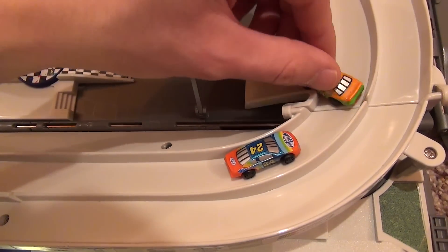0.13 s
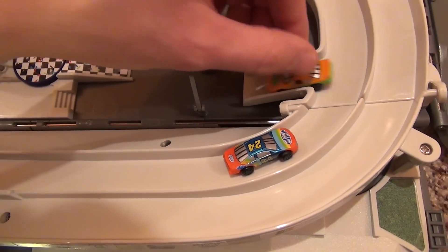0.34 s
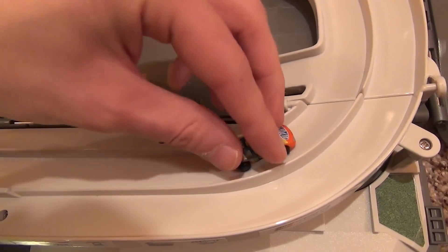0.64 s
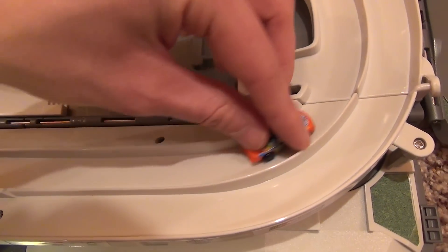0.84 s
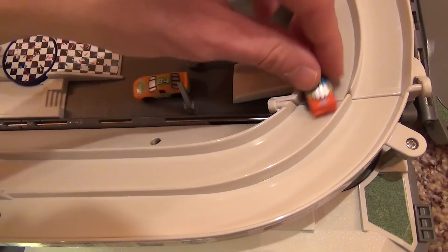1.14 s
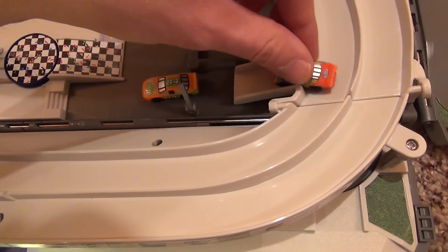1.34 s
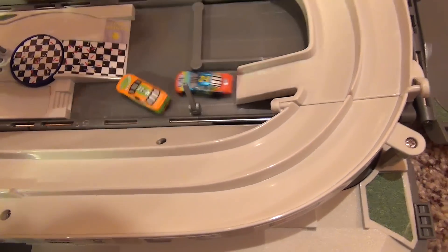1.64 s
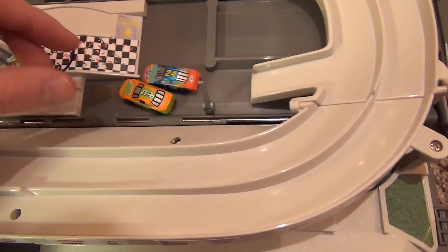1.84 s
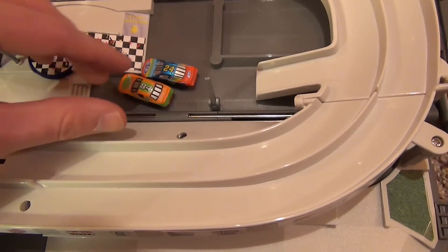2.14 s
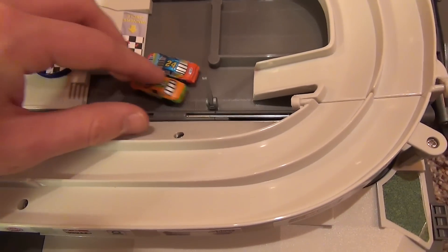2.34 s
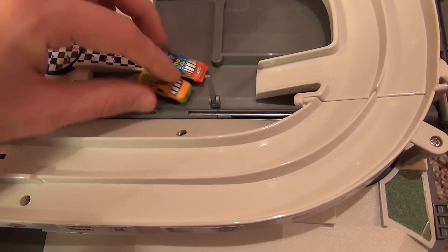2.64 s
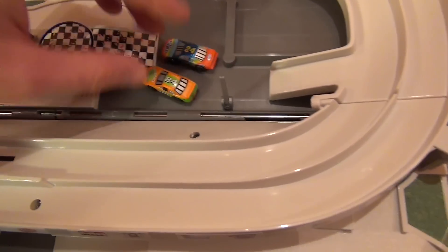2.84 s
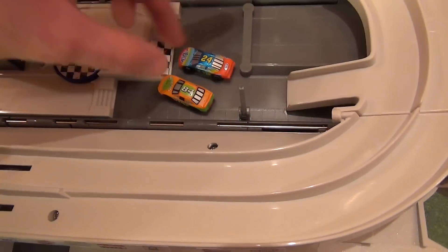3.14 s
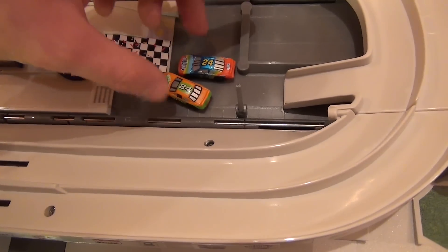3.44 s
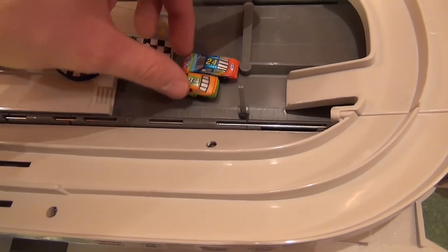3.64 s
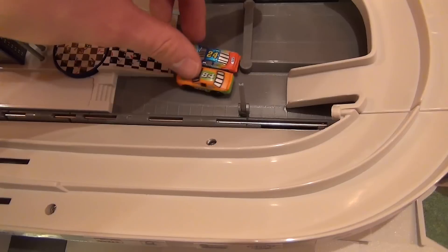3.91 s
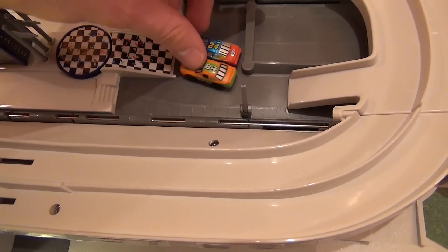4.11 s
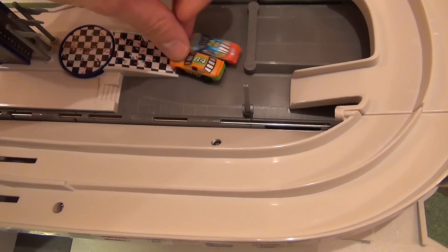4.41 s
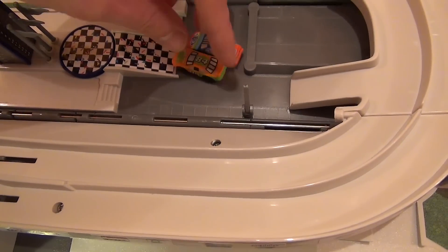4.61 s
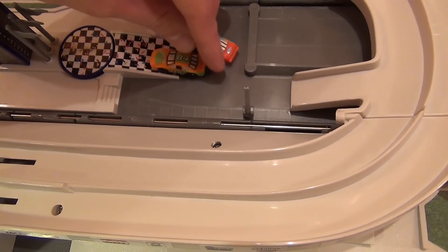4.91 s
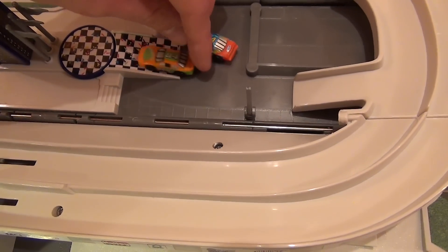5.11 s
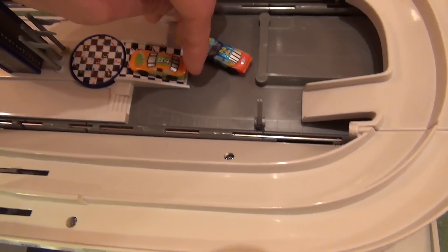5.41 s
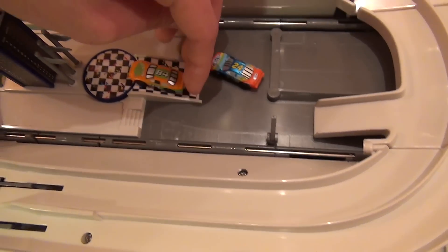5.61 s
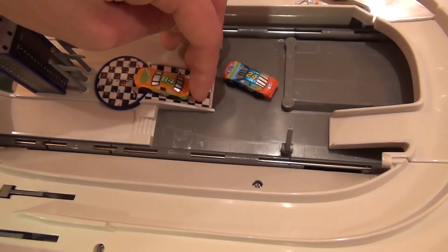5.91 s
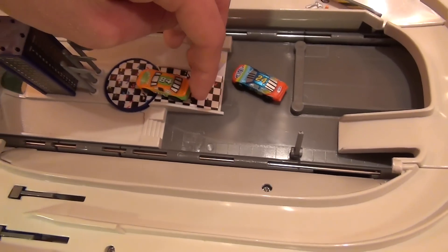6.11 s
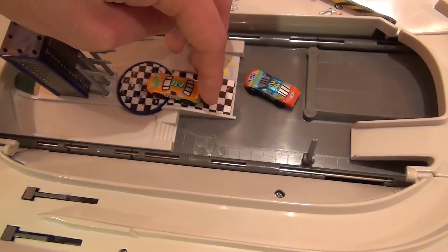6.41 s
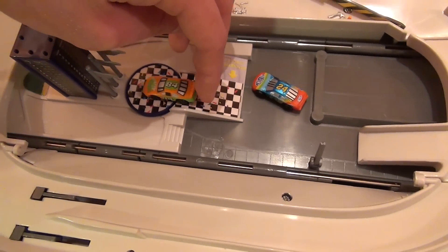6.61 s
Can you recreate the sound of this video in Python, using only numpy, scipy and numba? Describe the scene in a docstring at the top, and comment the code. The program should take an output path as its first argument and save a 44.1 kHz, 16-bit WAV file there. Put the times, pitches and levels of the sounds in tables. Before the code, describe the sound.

Light, bright clicks, taps and short rattling rolls of little toy cars on a plastic track, over a faint room hum.

```python
"""Two small die-cast toy cars are set down, let roll and nudged by hand on a hollow plastic track.
Each impact excites damped normal modes: bright, short ones in the car, dull, longer ones in the track.
Rolling drives the same modes with a dense stream of tiny contacts; light wheel and axle ticks ring
the car alone. The hollow ramp thrums at first. A wall echo and brief reverberation follow the contacts,
and a quiet room hums below, with two thin electronic whines."""
import sys
import numpy as np
from scipy import signal
from scipy.fft import rfft, irfft
from scipy.io import wavfile
from numba import njit

SR = 44100
rng = np.random.default_rng(int(sys.argv[2]) if len(sys.argv) > 2 else 0)


def dump(signal):
    """Clip the signal to [-1, 1] and save it as 16-bit WAV at the path in sys.argv[1]."""
    limited = np.clip(np.atleast_2d(signal).T, -1, 1)
    pcm = np.round(limited * 32767).astype(np.int16)
    wavfile.write(sys.argv[1], SR, pcm)


N = 297654

# spectral density of the room noise: frequency_hz, relative_db
HUM_SPECTRUM = [(20, -23), (90, 3.5), (400, -9), (640, -7), (1430, -7.5), (1560, -17.5), (4800, -26.5),
                (5600, -22), (16000, -27.5)]
# electronic whines: pitch_hz, rms_db
WHINE_TONES = [(7854, -80), (13248, -74)]
# normal modes of the plastic track: pitch_hz, relative_db, t60_s
TRACK_MODES = [(310, -17, 0.037), (495, -9.5, 0.011), (730, -10.5, 0.066), (873, 3.5, 0.011),
               (1038, -8, 0.034), (1368, -9.5, 0.032), (1731, -7, 0.011), (2110, -14, 0.0053),
               (2240, 7.5, 0.002)]
# normal modes of the car body, axles and wheels: pitch_hz, relative_db, t60_s
CAR_MODES = [(1784, -12, 0.005), (3845, -5, 0.0038), (4385, -8.5, 0.021), (5380, -12.5, 0.0065),
             (5860, -16.5, 0.012), (6252, -4, 0.0078), (7360, -8.5, 0.0087), (8217, -1, 0.015),
             (9130, 0.5, 0.0038), (9650, -1, 0.0036), (10750, -4.5, 0.004), (12100, -21.5, 0.0033)]
# which car is held, and how, favours some modes: start_s, mode_0_db, mode_2_db, modes_4_5_db, modes_6_7_db
GRIP_GAINS = [(0, 3.5, -5, 2, -2.5), (3.1, 2, 0.5, 2, -4.5), (4.749, 1, -2, 5, -8.5),
              (5.38, 9, -13, 5.5, -7.5)]
# spells of rolling and sliding: start_s, end_s, rattle_start_db, swell_db, rumble_start_db
ROLLING_SPELLS = [(-0.01, 0.343, -36.5, -15.5, -42.5), (0.425, 0.484, -32.5, 15, -41.5),
                  (0.496, 0.804, -20, -1.5, -29.5), (0.839, 1.051, -38, -1, -35),
                  (1.059, 1.128, -31, -5, -33.5), (1.22, 1.437, -38, -6, -39),
                  (1.457, 1.616, -31, 10.5, -35.5), (1.623, 1.802, -19.5, -6, -28.5),
                  (1.858, 1.926, -37, 3.5, -40), (2.43, 2.53, -35.5, 0, -33),
                  (2.637, 2.825, -41.5, -8, -39), (3.308, 3.335, -42.5, -5, -43),
                  (3.701, 3.875, -38.5, -10, -37), (4.006, 4.105, -46.5, 6.5, -44.5),
                  (4.114, 4.285, -58.5, 8.5, -50.5), (4.481, 4.569, -26, -13, -30.5),
                  (4.876, 5.05, -33.5, -32, -32.5), (5.05, 6.459, -53.5, -13, -47.5)]
# light ticks of wheels and axles: time_s, strength_db, pitch_hz
WHEEL_TICKS = [(0.4243, -7.5, 8400), (0.4668, -14, 6240), (0.5723, -3, 8800), (0.5851, -8.5, 11300),
               (0.6887, -3, 6300), (0.7803, -2.5, 6300), (1.497, -0.5, 9600), (1.532, 3, 9100),
               (1.5661, -5, 9100), (1.6409, -6.5, 8600), (1.6646, -5.5, 9100), (1.677, -3, 8040),
               (1.6958, -7, 8590), (1.7052, -1, 8200), (2.393, -3, 9500), (2.4552, -2, 9000),
               (2.855, -18.5, 8800), (3.649, -23.5, 5970), (3.7431, -19, 9500), (3.892, -13.5, 10100),
               (4.0622, -13.5, 5870), (4.373, -18.5, 11200), (4.458, -20, 9900), (4.837, -14, 10600),
               (5.1841, 3, 9100), (5.1913, 1, 8500), (5.298, -17, 10200), (5.846, -31.5, 5940),
               (5.9485, -36.5, 6140), (5.979, -33, 5700), (6.06, -33.5, 5560), (6.1176, -30.5, 8150),
               (6.2145, -29, 10400), (6.2844, -22, 8860), (6.346, -23.5, 11200), (6.418, -22, 6080),
               (6.6042, -20.5, 6700), (6.618, -29.5, 6000)]
# knocks of car on track: time_s, car_strength_db, track_strength_db
IMPACTS = [(0.016, -10, -15), (0.126, -21, -28.5), (0.215, -10, -17), (0.266, -26, -23),
           (0.401, -22.5, -28), (0.529, -7.5, -16), (0.624, -12.5, -24), (0.708, -9.5, -18),
           (0.756, -7, -22), (0.802, -11, -20), (0.818, -8.5, -27.5), (0.86, -10, -24),
           (1.039, -9.5, -14.5), (1.091, -11.5, -14), (1.175, -21.5, -18.5), (1.235, -6, -17.5),
           (1.458, -12.5, -19.5), (1.615, -10, -27), (1.723, -7, -25), (1.752, -10.5, -22),
           (1.886, -18, -51), (2.012, -20.5, -26.5), (2.355, -21.5, -21.5), (2.367, -5, -18.5),
           (2.383, -15, -26), (2.495, -16.5, -24.5), (2.513, -14.5, -24.5), (2.628, -19, -31),
           (2.668, -17, -24.5), (2.728, -19.5, -25), (2.779, -24.5, -23), (2.842, -13.5, -19),
           (3.311, -29.5, -36), (3.36, -14.5, -21), (3.66, -8.5, -17), (3.706, -16.5, -20),
           (3.866, -19, -18.5), (3.932, -9, -26.5), (3.958, -20, -28), (4.041, -21, -23.5),
           (4.345, -19, -20), (4.428, -23, -21.5), (4.483, -8.5, -22), (4.537, -11, -15.5),
           (4.565, -12.5, -19.5), (4.653, -35.5, -32.5), (4.716, -42, -32.5), (4.853, -8, -15.5),
           (4.881, -6, -12), (4.891, -4.5, -26), (4.922, -1, -11.5), (5.025, -26.5, -32), (5.043, -36, -23),
           (5.169, -27, -31), (5.224, -12.5, -20), (5.254, -23.5, -23.5), (5.288, -5.5, -15.5),
           (5.409, -25, -43), (5.449, -39, -27.5), (5.675, -19, -21.5), (5.74, -40, -36),
           (5.831, -21, -23.5), (5.864, -29.5, -30), (5.915, -36, -31.5), (6.002, -31.5, -34.5),
           (6.178, -27, -30.5), (6.394, -25.5, -35), (6.652, -29.5, -29.5)]

RAMP_UNTIL_S, RAMP_DB = 2.4, 8   # on the raised ramp the 1368 Hz track mode rings louder
START_DB_PER_S, STOP_DB_PER_S = 905.5, 296   # attack and decay of a spell
RUMBLE_FOLLOWS = 0.66   # share of the rattle's swell that the rumble follows
SETTLE_CAR_DB, SETTLE_TRACK_DB, SETTLE_DB_PER_S = -24, -9, 305.5   # the jiggle after a contact
TICK_FOCUS_DB_PER_OCTAVE = 21   # modes away from a tick's pitch are struck more weakly
DETUNE = 0.029   # relative spread of mode pitch from contact to contact
ROLL_DAMPING = 0.54   # wheels resting on the track shorten the decay times to this share


def from_db(db):
    """Amplitude ratio: tenfold for every 20 dB."""
    return 10 ** (np.asarray(db) / 20)


def unit_rms(x):
    """Normalisation to unit mean power."""
    return x / np.sqrt(np.mean(x ** 2) + 1e-20)


def drift(rate_hz):
    """Low-pass filtering turns white noise into a slow fluctuation of unit rms."""
    pole = np.exp(-80 * np.pi * rate_hz / SR)   # one step per 40 samples
    slow = signal.lfilter([1], [1, -2 * pole, pole * pole], rng.standard_normal(N // 40 + 2002))[2000:]
    return np.interp(np.arange(N) / 40, np.arange(len(slow)), unit_rms(slow))


def high_pass(x, hz):
    """Radiation efficiency: a small body radiates little bass."""
    return signal.sosfilt(signal.butter(3, hz, "high", fs=SR, output="sos"), x)


@njit
def resonate(force, poles):
    """A driven phasor turns and decays by its complex pole at each sample."""
    out, state = np.zeros(len(force)), 0j
    for i in range(len(force)):
        state = state * poles[i] + force[i]
        out[i] = state.imag
    return out


def ring(force, hz, t60):
    """Damped oscillator: a unit impulse starts a decaying sine of height 1; the pitch may vary."""
    pole = from_db(-60 / (t60 * SR)) * np.exp(2j * np.pi * hz / SR)
    return resonate(force + 1e-18, pole * np.ones(N))


def room_hum(correlation=0.9, rms_db=-54.5):
    """Partial coherence: steady noise, mostly common to both channels, lies under pure whines."""
    hz = np.maximum(np.fft.rfftfreq(N, 1 / SR), 1)
    corner_hz, corner_db = np.transpose(HUM_SPECTRUM)
    colour = from_db(np.interp(np.log(hz), np.log(corner_hz), corner_db))
    mid, side = irfft(rfft(rng.standard_normal((2, N))) * colour, N)
    noise = unit_rms(np.sqrt(1 + correlation) * mid + np.sqrt(1 - correlation) * side * [[1], [-1]])
    t = np.arange(N) / SR
    whines = sum(np.sqrt(2) * from_db(db) * np.sin(2 * np.pi * f * t) for f, db in WHINE_TONES)
    return from_db(rms_db) * noise + whines


def reverberation(x, t60_s=0.029, wall_cut_hz=1900, gain_db=-2):
    """Repeated reflection: eight feedback delays a side lose treble to the walls on every round."""
    out, pole = np.zeros((2, N)), np.exp(-2 * np.pi * wall_cut_hz / SR)
    for k, lag in enumerate((rng.uniform(0.0048, 0.024, 16) * SR).astype(int)):
        loop, gain, state = x.copy(), from_db(-60 * lag / SR / t60_s), [0.]
        for i in range(lag, N, lag):
            back, state = signal.lfilter([gain * (1 - pole)], [1, -pole], loop[i - lag:i], zi=state)
            loop[i:i + lag] += back[:N - i]
        out[k % 2] += (loop - x) * (-1) ** (k // 2)
    return from_db(gain_db) * out


def wall_echo(x, delay_s=0.0007, gain_db=-22.5):
    """Early reflection: a thin bounce off the track wall, opposite in polarity in the two channels."""
    treble = signal.sosfilt(signal.butter(3, [3000, 16000], "band", fs=SR, output="sos"), x)
    return from_db(gain_db) * np.roll(treble, int(delay_s * SR)) * [[1], [-1]]


def ramp_thrum(level_db=-54, fade_s=1.1):
    """Noise-driven resonance: the hollow ramp hums low and unevenly while the cars are on it."""
    fade = np.clip((RAMP_UNTIL_S - np.arange(N) / SR) / fade_s, 0, 1)
    level = from_db(level_db + 2.5 * drift(8.6)) * fade
    resonance = ring(rng.standard_normal(N), hz=105, t60=0.034)
    return level * unit_rms(high_pass(resonance, hz=61))


def mode_gains(colour_db, modes):
    """Energy partition: a colouring shifts power among the modes (first axis) and keeps the total."""
    _, level_db, t60 = np.transpose(modes)[:, :, None]
    power = from_db(level_db) ** 2 * t60
    coloured_power = np.sum(power * from_db(colour_db) ** 2, axis=0)
    return from_db(level_db + colour_db) * np.sqrt(power.sum() / coloured_power)


def superpose(rings, favour_db):
    """Superposition: the modes add, with extra gain for those listed by index."""
    return sum(x * from_db(favour_db.get(k, 0)) for k, x in enumerate(rings))


def rolling_envelopes():
    """Incoherent addition: spells and jiggles sum in power to the rattle and rumble amplitudes."""
    t = np.arange(0, N, 16) / SR

    def settling_db(onset_s):
        """Exponential decay is a straight line in decibels."""
        return np.where(t > onset_s, -SETTLE_DB_PER_S * (t - onset_s), -np.inf)

    start, end, rattle_db, swell_db, rumble_db = np.transpose(ROLLING_SPELLS)[:, :, None]
    edge_db = -START_DB_PER_S * np.maximum(start - t, 0) - STOP_DB_PER_S * np.maximum(t - end, 0)
    grown_db = swell_db * np.clip((t - start) / (end - start), 0, 1)
    impact_s, car_db, track_db = np.transpose(IMPACTS)[:, :, None]
    tick_s, tick_db, _ = np.transpose(WHEEL_TICKS)[:, :, None]
    rattle_db = np.vstack([rattle_db + grown_db + edge_db,
                           car_db + SETTLE_CAR_DB + settling_db(impact_s),
                           tick_db + SETTLE_CAR_DB + settling_db(tick_s)])
    rumble_db = np.vstack([rumble_db + RUMBLE_FOLLOWS * grown_db + edge_db,
                           track_db + SETTLE_TRACK_DB + settling_db(impact_s)])
    powers = [np.sum(from_db(np.maximum(db, -100)) ** 2, axis=0) for db in (rattle_db, rumble_db)]
    return [np.interp(np.arange(N) / SR, t, np.sqrt(power)) for power in powers]


def rolling(modes, contacts_per_s, size_db, clump_db, wander_db):
    """Shot noise: tiny contacts come in clumps, and the moving contact favours changing modes."""
    clumps = from_db(clump_db * drift(60) - clump_db ** 2 * np.log(10) / 20)   # constant mean power
    sizes = from_db(size_db * np.minimum(rng.exponential(1, N), 4))
    contacts = sizes * (rng.random(N) < contacts_per_s / SR) * clumps
    gains = mode_gains(wander_db * np.array([drift(14) for _ in modes]), modes)
    rings = np.array([ring(gain * contacts * rng.standard_normal(N), hz, ROLL_DAMPING * t60)
                      for gain, (hz, _, t60) in zip(gains, modes)])
    return rings / np.std(rings.sum(axis=0))


def knocks(modes, times_s, strength_db, rise_s, fall_s, spread_db, coupling_db, colour_db=0, pure=False):
    """Impact excitation: a brief, spiky force drives each mode with a random strength of its own."""
    scatter, bend = rng.standard_normal((len(times_s), 2, len(modes))).transpose(1, 2, 0)
    t = np.arange(N) / SR
    current = np.clip(np.searchsorted(times_s - 4 * rise_s, t) - 1, 0, None)
    age = t - times_s[current]
    envelope = np.exp(-np.abs(age) / np.where(age < 0, rise_s, fall_s))
    force = envelope * rng.standard_normal(N) * np.abs(rng.standard_normal(N))
    # each knock carries the energy of its envelope
    force *= np.sqrt(np.bincount(current, envelope ** 2) / np.bincount(current, force ** 2))[current]
    gains = from_db(strength_db + coupling_db) * mode_gains(colour_db + spread_db * scatter, modes)
    rings = []
    for k, (hz, _, t60) in enumerate(modes):
        pitch_hz = hz * (1 + DETUNE * bend[k, current])
        response = ring(gains[k, current] * force, pitch_hz, t60)
        if pure:   # a second pass deepens the valleys between the modes
            response = ring(response, pitch_hz, t60 / 2) * 4 * np.log(1000) / (t60 * SR)
        rings.append(response)
    return np.array(rings)


def plastic_track(rumble):
    """Forced vibration: knocks and rolling wheels drive the low modes of the hollow track."""
    impact_s, _, impact_db = np.transpose(IMPACTS)
    rings = knocks(TRACK_MODES, impact_s, impact_db, rise_s=0.0028, fall_s=0.013,
                   spread_db=10.5, coupling_db=-30)
    rings += rumble * rolling(TRACK_MODES, contacts_per_s=1500, size_db=0, clump_db=1, wander_db=6)
    on_ramp = np.arange(N) / SR < RAMP_UNTIL_S
    return high_pass(superpose(rings, {5: RAMP_DB * on_ramp}), hz=280)


def wheel_ticks():
    """Selective excitation: wheel and axle ticks favour the car modes nearest their pitch."""
    tick_s, tick_db, tick_hz = np.transpose(WHEEL_TICKS)
    octaves_away = np.abs(np.log2(np.array(CAR_MODES)[:, :1] / tick_hz))
    focus_db = -TICK_FOCUS_DB_PER_OCTAVE * np.minimum(octaves_away, 0.5)
    return knocks(CAR_MODES, tick_s, tick_db, rise_s=0.0002, fall_s=0.0025,
                  spread_db=5.5, coupling_db=-17.5, colour_db=focus_db, pure=True)


def toy_cars(rattle):
    """Modal vibration: knocks, ticks and rolling ring the cars' high modes, weighted by the grip."""
    impact_s, impact_db, _ = np.transpose(IMPACTS)
    rings = knocks(CAR_MODES, impact_s, impact_db, rise_s=0.00098, fall_s=0.0032,
                   spread_db=6, coupling_db=-19.5)
    rings += wheel_ticks()
    pace = np.clip(rattle / 0.12, 0, 1)   # a fast car rattles in coarse clumps, a slow one whispers evenly
    rings += rattle * rolling(CAR_MODES, contacts_per_s=8000, size_db=2.1 * pace,
                              clump_db=3.7 * pace, wander_db=5.5)
    grips = np.array(GRIP_GAINS)
    grip = grips[np.searchsorted(grips[1:, 0], np.arange(N) / SR)].T
    favour_db = {0: grip[1], 2: grip[2], 4: grip[3], 5: grip[3], 6: grip[4], 7: grip[4]}
    return high_pass(superpose(rings, favour_db), hz=1410)


def scene():
    """Sound pressures add: cars and track, their reflections, the room's hum and the ramp's thrum."""
    rattle, rumble = rolling_envelopes()
    direct = toy_cars(rattle) + plastic_track(rumble)
    return direct + wall_echo(direct) + reverberation(direct) + room_hum() + ramp_thrum()


def record(dry):
    """Soft saturation rounds the peaks; a steep low-pass removes the highest treble."""
    return signal.sosfilt(signal.cheby2(14, 70, 16450, fs=SR, output="sos"), np.tanh(dry))


dry = scene()
out = record(dry)
dump(out)
```